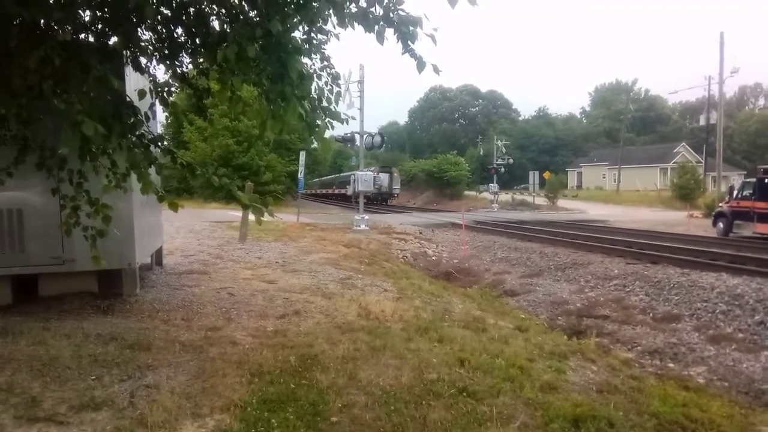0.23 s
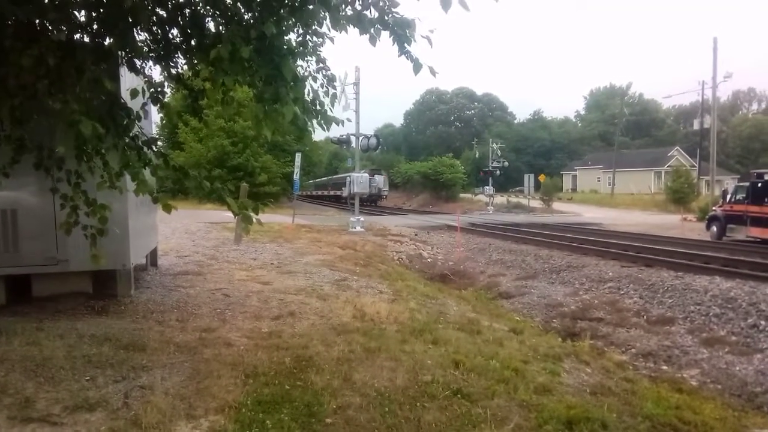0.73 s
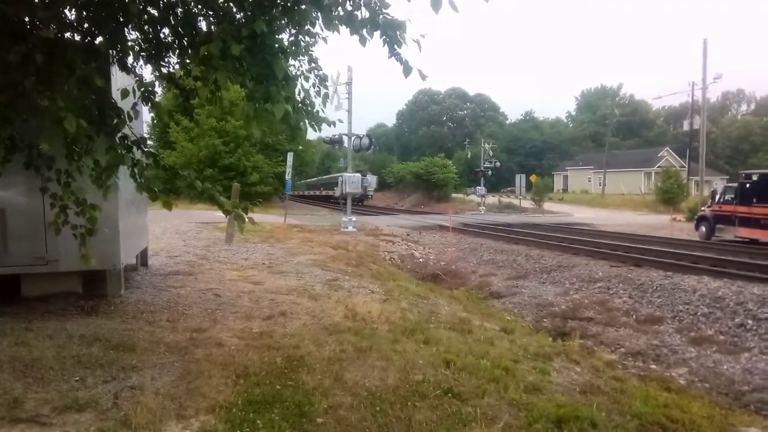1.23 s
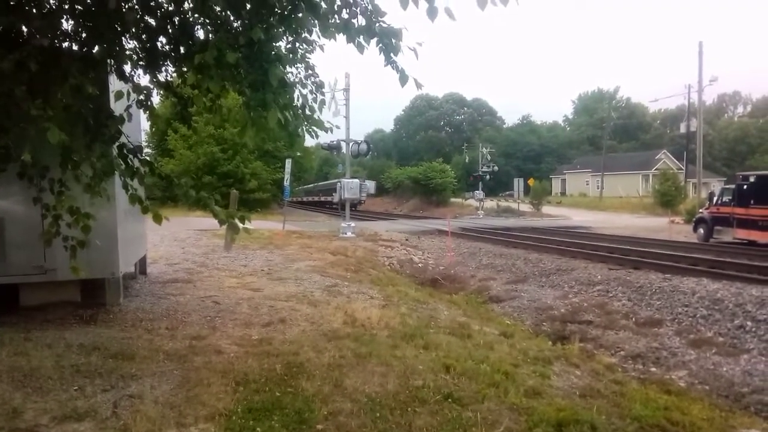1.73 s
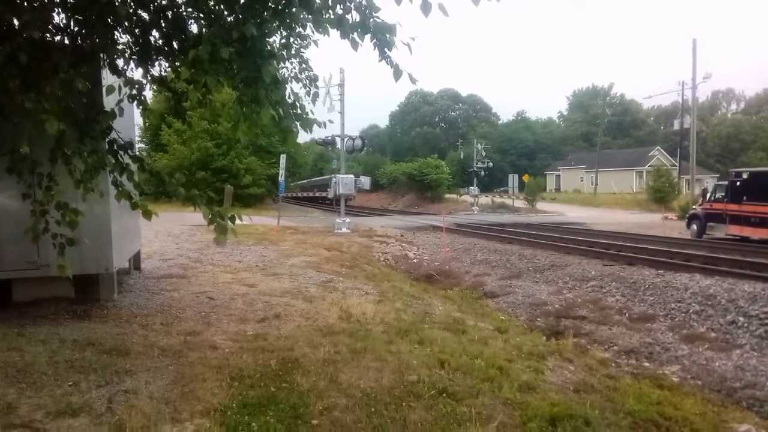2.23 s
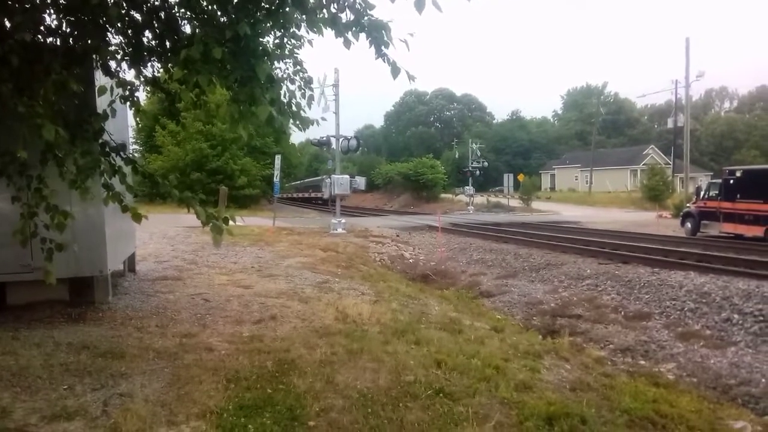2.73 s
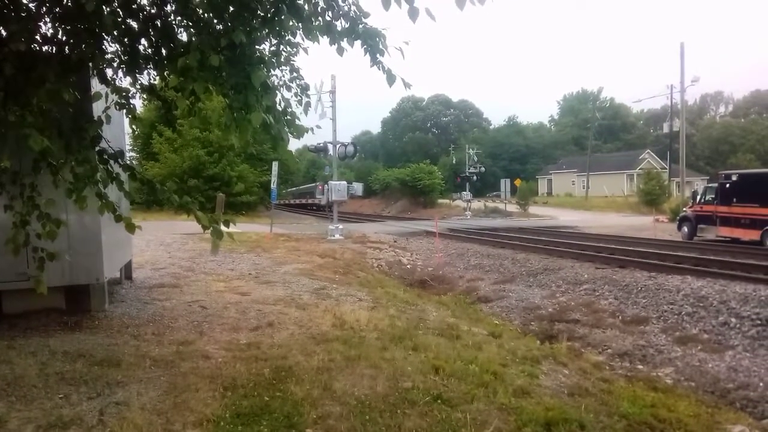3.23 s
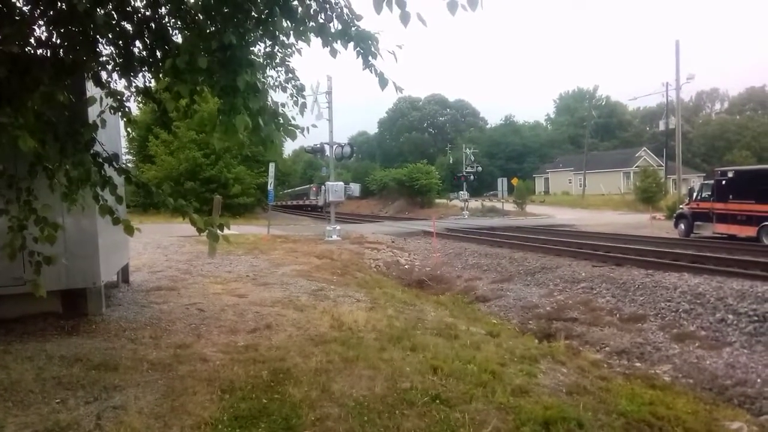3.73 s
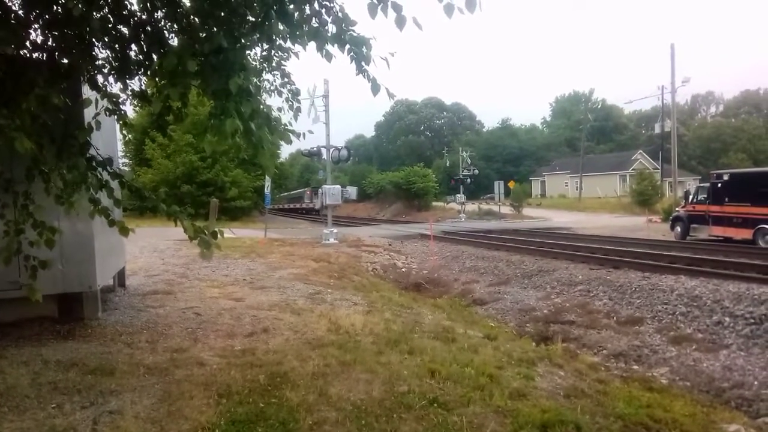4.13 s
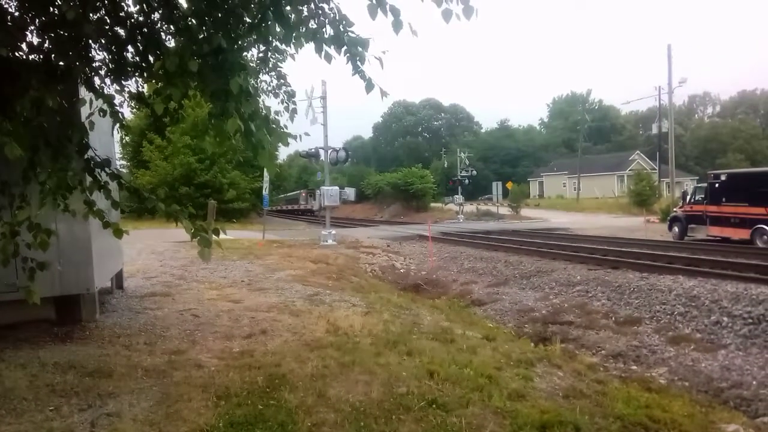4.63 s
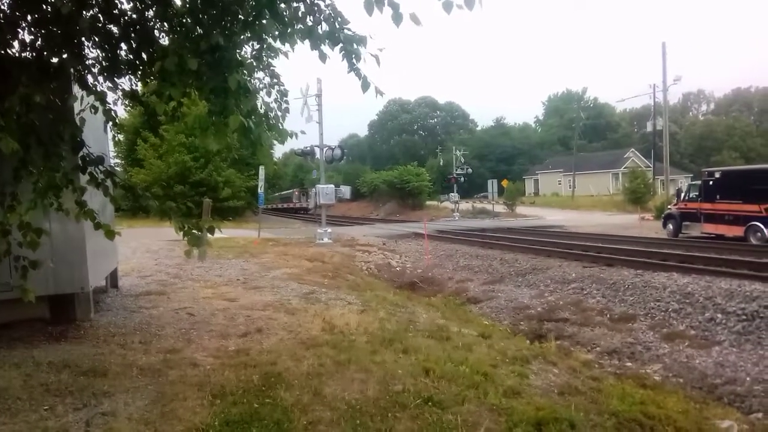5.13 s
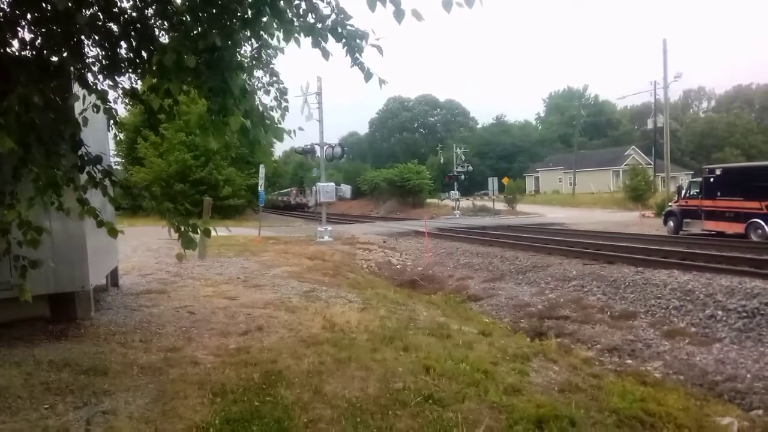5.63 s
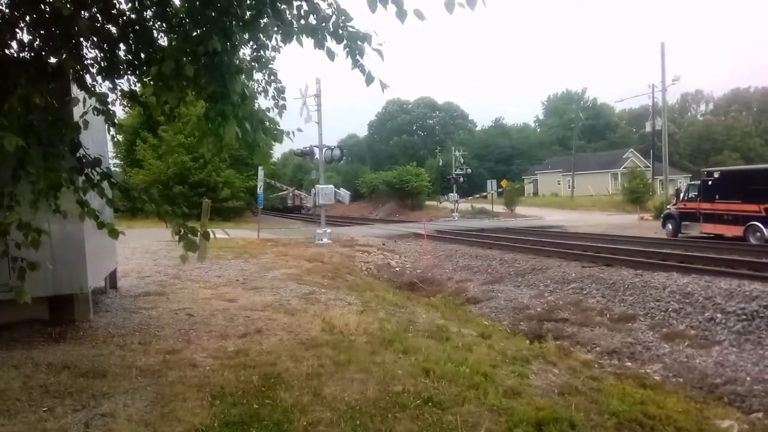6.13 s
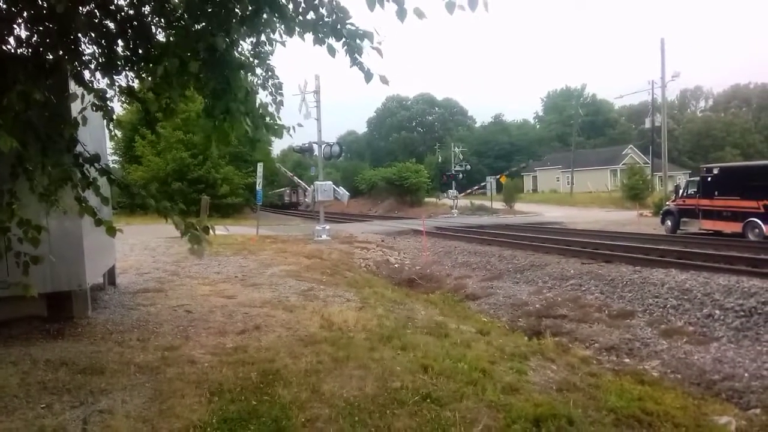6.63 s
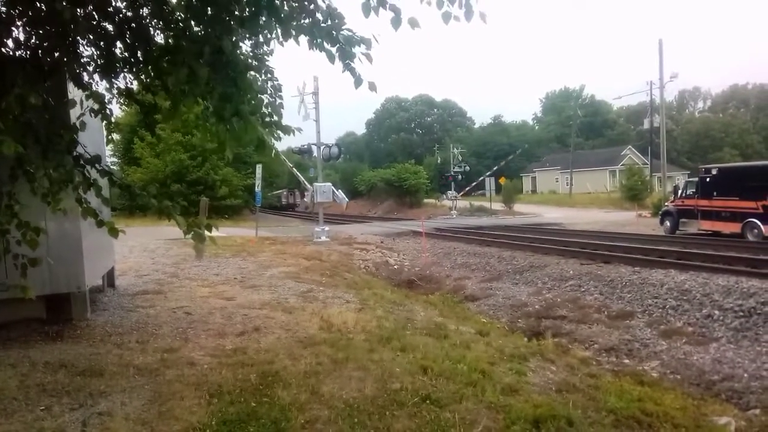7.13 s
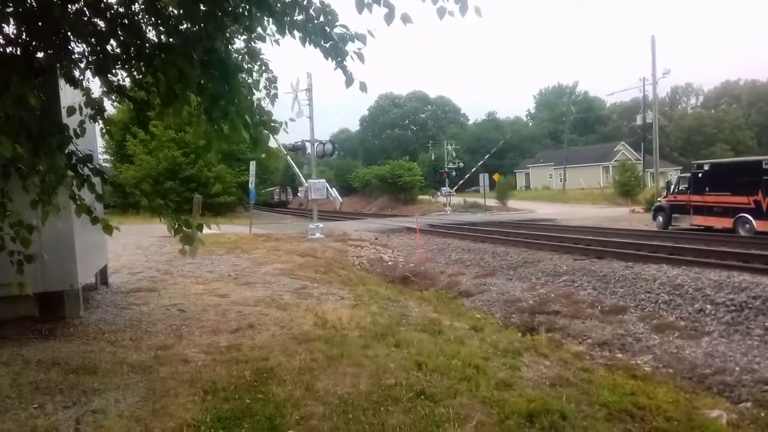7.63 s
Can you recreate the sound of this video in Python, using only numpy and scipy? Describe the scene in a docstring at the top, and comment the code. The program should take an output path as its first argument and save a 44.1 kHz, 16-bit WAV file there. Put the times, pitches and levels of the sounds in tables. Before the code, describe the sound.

Close songbird outdoors repeats a single clear whistle five times, each sliding upward, flicking sharply higher and snapping down, with close wall reflections and a faint late echo. A distant train drones low with soft hiss and a thin steady whine. Tiny chips and peeps come from other birds. Past five seconds a metal latch clatters, then a waiting truck revs up. Phone microphone, mono, dull at the very top.

```python
"""Songbird by a railway crossing

A songbird in a tree whistles one note five times: a slow rise, a flick up, a quick fall, all gliding sines.
A shed wall close by throws each note back, trees smear it and far walls answer late, as one impulse response.
A distant train drones in filtered noise, a gate latch clatters as ringing modes, small birds peep and chip,
and a waiting truck revs up on crank orders and intake hiss. A phone with gain control hears it all."""
import sys
import numpy as np
from scipy import signal
from scipy.fft import rfft, irfft
from scipy.io import wavfile
from scipy.ndimage import uniform_filter1d

SR = 44100
rng = np.random.default_rng(int(sys.argv[2]) if len(sys.argv) > 2 else 0)


def volts(x):
    """Linear amplitude factor 10**(x/20) for a level x in dB, scalar or array-like."""
    e = np.asarray(x, float) / 20
    return 10 ** e


def persist_wave(psi):
    """Save psi, clipped to +-1, as 16-bit WAV."""
    counts = np.round(np.clip(psi, -1, 1) * 32767).astype(np.int16)
    wavfile.write(sys.argv[1], SR, np.atleast_2d(counts).T)


N = 347508
TIME = np.arange(N) / SR

# Distant train and town. Each row: time in seconds, rumble level in dB, change of the hiss in dB.
AIR_LEVELS = [(0.0, -46.5, -1), (0.35, -44.5, 3.5), (0.61, -44.5, 1), (2.48, -46.5, -0.5),
              (3.14, -46.5, -2.5), (3.53, -46.5, -2), (3.88, -46, -2.5), (5.07, -47, -2.5), (5.46, -45, -2),
              (7.48, -44, -0.5), (7.88, -46, 0.5)]
# Tone colour of that far noise. Each row: frequency in Hz, relative density in dB per Hz.
AIR_COLOUR = [(25, -23.5), (48, -23.5), (64, -2), (110, -4), (310, -10.5), (500, -19), (790, -14),
              (1300, -22.5), (2000, -22.5), (4000, -24.5), (5000, -28), (6300, -34), (7200, -43),
              (8000, -41.5)]
# Steady droning lines. Each row: centre in Hz, width of each of two filters in Hz, level in dB.
DRONE_LINES = [(68.1, 9.3, -50.5), (100.7, 9.1, -56.5), (169.94, 6.5, -52.5), (261.2, 7.9, -65.5),
               (1599, 160, -59)]
# Path of the whine. Each row: time in seconds, pitch in Hz, level in dB before it wavers.
WHINE_PATH = [(0, 1563, -61), (2.2, 1563, -60), (2.7, 1562, -57), (4.2, 1562, -57), (4.9, 1563, -63),
              (7.88, 1563, -63)]

# The truck revving up. Each row: time in seconds, firing rate in Hz, engine level in dB, intake hiss in dB.
TRUCK_REVS = [(6.451, 83.5, -59, -42.5), (6.599, 95.37, -53, -67), (6.776, 127.5, -44.5, -56.5),
              (6.86, 148, -44, -53), (6.986, 165.3, -43.5, -50), (7.205, 184.1, -46, -47.5),
              (7.492, 189.4, -44.5, -46), (7.88, 180.7, -49.5, -49.5)]
# Engine harmonics. Each row: order in sixths of the firing rate, relative level in dB.
CRANK_ORDERS = [(2, -24), (3, -34), (4, -6), (5, -10.5), (6, 2.5), (8, -12), (9, -20), (12, -15)]
# Intake resonances. Each row: centre in Hz, width of each of two filters in Hz, relative level in dB.
INTAKE_RESONANCES = [(2447, 170, -4), (3900, 1500, 1), (4740, 180, -13), (6160, 2400, -3)]

# Latch blows. Each row: start in seconds, peak in dB, weight of the lowest and highest modes in dB,
# rattle t60 in seconds.
LATCH_BLOWS = [(5.1718, -24.5, -8.5, 0.14), (5.1994, -26.5, -11, 0.15), (5.24, -33.5, -22, 0.2),
               (5.2705, -36.5, -15.5, 0.27), (5.3309, -24, -6.5, 0.18), (5.3663, -21.5, 4.5, 0.14),
               (5.4359, -26, 2.5, 0.2)]
# Ringing modes of the latch. Each row: frequency in Hz, relative level in dB, t60 in seconds.
LATCH_MODES = [(694, 1, .03), (857, 0, 0.043), (956, -2.5, 0.064), (1586, -6.5, 0.05), (1770, -3, 0.037),
               (2470, -1.5, 0.03), (3250, -5.5, 0.035), (4230, -8.5, 0.052), (6300, -8.5, 0.14)]

# Thin whistles of small birds and the first warble of a new phrase, one list per call.
# Each row: time in seconds, pitch in Hz, level in dB before the tree mix halves it.
PEEPS = [
    [(5.862, 6480, -60), (5.885, 6540, -44), (5.91, 6500, -60), (5.935, 6750, -54.5), (5.965, 6920, -61),
     (5.985, 7300, -56), (5.995, 7260, -69)],
    [(6.36, 4150, -59), (6.39, 4170, -53), (6.6, 4200, -52), (6.8, 4220, -55.5), (6.83, 4330, -58)],
    [(7.861, 2100, -42), (7.867, 3080, -38), (7.869, 2840, -36), (7.871, 2300, -32), (7.88, 3250, -30)],
]
# Very short chips. Each row: time in seconds 2 ms ahead of the peak, peak in dB before the tree mix
# halves it, pitch at the peak in Hz.
CHIPS = [(1.3184, -28.5, 5650), (1.515, -42.5, 5900), (6.6337, -43.5, 6400), (6.8404, -41, 5220)]

# Walls close by. Each row: delay in seconds, level in dB before the treble is dulled, sign.
NEAR_ECHOES = [(.0092, 0, -1), (.0031, -13, 1), (.0173, -12, 1), (.0222, -15, -1)]
# Scattering by leaves and trunks. Each row: onset in seconds, t60 in seconds, level in dB.
TREES = [(.008, 0.17, -8), (.03, 1.2, -18)]
# Far walls. Each row: delay in seconds, level in dB.
FAR_ECHOES = [(.488, -28.5), (.31, -37)]
WALL_DULL_HZ = 4100
FAR_HZ, FAR_BLUR_S = 3350, .00045  # far walls return a band around this pitch best

# Song notes. Each row: start in seconds, flick in seconds, level in dB before swell and throat,
# knee pitch in Hz, climb in Hz per second, held pitch in Hz, side voice level in dB.
NOTES = [(0.187, 0.321, -26, 2582, 5880, 3222, -39.5), (1.849, 1.993, -26, 2501, 6630, 3253, -38.5),
         (3.372, 3.506, -21.5, 2647, 4380, 3117, -47.5), (4.448, 4.584, -23.5, 2612, 4560, 3190, -39.5),
         (5.950, 6.09, -24, 2418, 6300, 3179, -37.5)]
# Swell of the rise. Each row: share of the rise, dB relative to the note level.
SWELL = [(0, -9), (0.059, -7.5), (.25, -5), (.45, -3), (1, -0.5)]
# Fall of the note. Each row: seconds after the flick, pitch in Hz, dB relative to the note level.
FALL = [(0, 3600, 1.5), (.003, 3150, -2.5), (.012, 2900, -3.5), (.021, 2470, 2.5), (.029, 1950, 0.5),
        (.032, 1850, -29)]
# The thin second voice. Each row: seconds from the flick start, pitch in Hz, dB relative to its own level.
SIDE_VOICE = [(-.05, 4400, -31), (-.042, 4350, -4.5), (-.02, 4050, 2), (0, 4050, -4), (.004, 4200, -21.5)]
# Breath of the snap. Each row: seconds from the flick start, pitch in Hz, dB relative to the note level.
AIRY = [(0, 7300, -51.5), (.006, 7300, -26.5), (.03, 7000, -25), (0.045, 7100, -50.5)]
# Throat and beak: low pitches leave weaker. Each row: pitch in Hz, gain in dB.
THROAT = [(1800, -19), (2400, -6), (2900, 3), (4800, -9.5)]
# Overtone colour. Each row: frequency of the 2nd or 3rd partial in Hz, gain in dB.
OVERTONES = [(3600, -15.5), (4600, -26), (6400, -26.5), (6900, -42), (7600, -36), (9000, -52.5)]
START_HZ, SCOOP_S, EASE_S = 1872, .012, 0.0121  # scoops up to the knee, climbs evenly, eases into the hold
FLICK_S, FLICK_TOP_HZ, FLICK_DB = .007, 4584, -12.5  # alike in every note, however loud its rise
OCTAVE_DB, THIRD_DB, SUM_TONE_DB = -20, -9, -13.5  # the octave too ignores the loudness of the rise


def curve(s, values, at=TIME):
    """Straight lines between points."""
    return np.interp(at, s, values)


def unit(x):
    """Scale to rms 1."""
    return x / np.sqrt(np.mean(x ** 2))


def band(x, hz, width_hz):
    """Resonance, gain 1 at the centre."""
    return signal.lfilter(*signal.iirpeak(hz, hz / width_hz, SR), x)


def walk(rate):
    """Smooth chance, spread 1, from about rate random steps a second."""
    k = int(SR / rate)
    steps = np.repeat(rng.standard_normal(N // k + 1), k)
    return unit(uniform_filter1d(uniform_filter1d(steps, k), k)[:N])


def whistle(s, hz, db, overtones=(), rough=0., wobble_hz=0.):
    """A gliding sine silent outside its span; overtones, if asked for, come unsteady and with the throat."""
    gate = np.clip(np.minimum(TIME - s[0], s[-1] - TIME) / .002, 0, 1)
    pitch = curve(s, hz)
    if wobble_hz:
        pitch = pitch + wobble_hz * walk(1500)
    phase = 2 * np.pi * (np.cumsum(pitch) / SR + rng.random())
    tone = np.sin(phase)
    if overtones:
        tone = tone * volts(curve(*np.transpose(THROAT), pitch))
        partials = 0
        for k, overtone_db in enumerate(overtones, start=2):
            colour_db = curve(*np.transpose(OVERTONES), k * pitch)
            partials = partials + volts(overtone_db + colour_db) * np.sin(k * phase)
        tone += volts(3.3 * walk(300)) * partials
    if rough:
        tone = tone * (1 + rough * walk(500))
    return np.sqrt(2) * gate * volts(curve(s, db)) * tone


def distance():
    """Half-octave bands of far noise that sway a little, droning lines and a wavering whine."""
    s, rumble_db, hiss_db = np.transpose(AIR_LEVELS)
    hz, colour_db = np.transpose(AIR_COLOUR)
    f = np.fft.rfftfreq(N, 1 / SR) + 1  # 1 Hz up, to keep the logarithm finite
    spectrum = rfft(rng.standard_normal(N)) * volts(curve(np.log(hz), colour_db, np.log(f)))
    middle = spectrum[(f > 200) & (f < 1400)]
    spectrum /= np.sqrt(2 * np.sum(np.abs(middle) ** 2)) / N  # rms 1 in the middle band
    air = 0
    mean_db = rumble_db.mean()
    for octave in np.arange(4, 13.5, .5):  # centres as powers of two in Hz
        part = irfft(spectrum * np.clip(1 - 2 * np.abs(np.log2(f) - octave), 0, 1), N)
        bright = np.clip((octave - 10.3) / 1.7, 0, 1)  # hands over from rumble to hiss
        moving_db = np.clip(octave - 7, .3, 1) * (rumble_db - mean_db)  # the deepest bands move less
        slow_db = (1 - bright) * moving_db + bright * hiss_db + mean_db
        air = air + part * volts(curve(s, slow_db) + 0.8 * walk(6))
    drone = 0
    for hz, width_hz, db in DRONE_LINES:
        line = band(band(rng.standard_normal(N), hz, width_hz), hz, width_hz)
        drone = drone + volts(db) * unit(line)
    whine = whistle(*np.transpose(WHINE_PATH)) * volts(2.8 * walk(8.3))
    return air + drone + whine


def truck():
    """Crank orders climb with the revs; the intake hisses once a firing."""
    s, firing_hz, engine_db, hiss_db = np.transpose(TRUCK_REVS)
    firings = np.cumsum(curve(s, firing_hz) * (1 + 0.0092 * walk(15))) / SR
    orders = 0
    for k, db in CRANK_ORDERS:
        tone = np.sin(2 * np.pi * (k / 6 * firings + rng.random()))
        orders = orders + volts(db + 2 * walk(5.4)) * tone
    gas = rng.standard_normal(N) * (.5 + np.exp(-(firings % 1) / .3))
    hiss = 0
    for hz, width_hz, db in INTAKE_RESONANCES:
        hiss = hiss + volts(db) * unit(band(band(gas, hz, width_hz), hz, width_hz))
    engine = np.sqrt(2) * volts(curve(s, engine_db)) * orders
    intake = volts(curve(s, hiss_db) + 1.1 * walk(14)) * unit(hiss)
    fade_in = np.clip((TIME - s[0]) / 0.33, 0, 1)
    return fade_in * (engine + intake)


def latch():
    """Each blow is a short rattle that cracks and rings the latch modes."""
    out = np.zeros(N)
    t = np.arange(int(.3 * SR)) / SR
    for s, peak_db, edge_db, rattle_t60 in LATCH_BLOWS:
        rattle = rng.standard_normal(len(t)) * volts(6 * rng.standard_normal(len(t)))  # spiky noise
        rattle = rattle * np.exp(-np.log(1000) * t / rattle_t60)
        ring = 0
        for hz, db, t60 in LATCH_MODES:
            level_db = db + 3.34 * rng.standard_normal()  # each blow excites the modes differently
            if hz < 1000 or hz > 6000:
                level_db += edge_db
            width_hz = np.log(1000) / np.pi / t60
            ring = ring + volts(level_db) * unit(band(rattle, hz, width_hz))
        crack = volts(4.5) * unit(band(rattle, 2700, 6000))
        hit = ring + crack
        i = int(s * SR)
        out[i:i + len(t)] += volts(peak_db) * hit / np.max(np.abs(hit))
    return out


def small_birds():
    """Thin gliding peeps, and very short chips whose pitch drops steeply under a bell-shaped swell."""
    out = sum(whistle(*np.transpose(peep), rough=.15) for peep in PEEPS)
    for s, db, hz in CHIPS:
        t = TIME - s - .002
        swell = np.exp(-(t / 0.0014) ** 2)
        out += volts(db) * swell * np.sin(2 * np.pi * (hz * t - 290000.0 * t ** 2))
    return out


def surroundings(walls):
    """Impulse response: direct sound, walls close by, leaves and trunks that scatter, far walls."""
    t = np.arange(int(1.2 * SR)) / SR
    response = np.zeros(len(t))
    for s, db, sign in walls:
        response += np.sign(sign) * volts(db) * np.sinc((t - s) * SR)
    # boards return the treble weaker
    response = signal.filtfilt(*signal.butter(4, WALL_DULL_HZ, fs=SR), response)
    response[0] += 1  # direct sound
    for onset, t60, db in TREES:
        decay = np.exp(-np.log(1000) * t / t60) * (1 - np.exp(-t / onset))
        tail = rng.standard_normal(len(t)) * decay
        response += volts(db) * tail / np.sqrt(np.sum(tail ** 2))
    for s, db in FAR_ECHOES:
        blur = np.exp(-((t - s) / FAR_BLUR_S) ** 2)
        gain = volts(db) * 2 / (np.sqrt(np.pi) * FAR_BLUR_S * SR)  # makes db the gain at FAR_HZ
        response += gain * np.cos(2 * np.pi * FAR_HZ * (t - s)) * blur
    return response


def songbird():
    """One side of the voice box rises, flicks up and falls; the other side adds a thin rasp."""
    out = np.zeros(N)
    share, swell_db = np.transpose(SWELL)
    for start, end, db, knee_hz, climb, held_hz, side_db in NOTES:
        fine = np.linspace(start, end, num=80)
        t = fine - start
        ease_hz = climb * EASE_S
        # soft minimum of the even climb and the held pitch
        ramp = -ease_hz * np.logaddexp(-(knee_hz + climb * t) / ease_hz, -held_hz / ease_hz)
        pitch = ramp - (knee_hz - START_HZ) * np.exp(-t / SCOOP_S)
        level_db = db + curve(start + share * (end - start), swell_db, fine)
        last_hz = pitch[-1]
        flick = end + FLICK_S * np.array([.4, .8, 1.2, 1.5])
        flick_hz = last_hz + (FLICK_TOP_HZ - last_hz) * np.array([.25, .72, .95, .98])
        flick_db = FLICK_DB + np.array([-5, 0, -1, -14])
        out += whistle(np.r_[fine, flick], np.r_[pitch, flick_hz], np.r_[level_db, flick_db],
                       overtones=(OCTAVE_DB - db, THIRD_DB))
        after, hz, fall_db = np.transpose(FALL)
        out += whistle(flick[2] + after, hz, db + fall_db, overtones=(-40,), rough=0.3, wobble_hz=59.9)
        after, hz, thin_db = np.transpose(SIDE_VOICE)
        thin_db = side_db + thin_db
        out += whistle(end + after, hz, thin_db, rough=0.7, wobble_hz=261)
        # the two sides mix in the windpipe into a faint sum tone
        out += whistle(end + after, hz + last_hz, thin_db + SUM_TONE_DB, rough=0.95, wobble_hz=60)
        after, hz, airy_db = np.transpose(AIRY)
        out += whistle(end + after, hz, db + airy_db, rough=1.3, wobble_hz=590)
    return out


def scene():
    """The songbird sits by the shed wall; the small birds are heard half direct, half through the trees."""
    background = distance() + truck() + latch()
    birds = small_birds()
    through_trees = signal.fftconvolve(birds, surroundings(NEAR_ECHOES[2:]))[:N]
    further = (birds + through_trees) / 2
    near = signal.fftconvolve(songbird(), surroundings(NEAR_ECHOES))[:N]
    return (background + further + near)[None]


def low_pass(x):
    """Removes everything above the highest recorded frequency."""
    return signal.sosfilt(signal.butter(12, 7800, fs=SR, output="sos"), x)


def record(dry):
    """Gain control eases off under loud notes, sparing the bass; the microphone path ends steeply near the top."""
    follow = 1 / (.015 * SR)  # 15 ms level follower
    loud = np.sqrt(signal.lfilter([follow], [1, follow - 1], dry ** 2) + 1e-12)
    bass = signal.sosfiltfilt(signal.butter(2, 300, fs=SR, output="sos"), dry)
    gain = (1 + (loud / volts(-26)) ** 2) ** -.33
    eased = bass + (dry - bass) * gain
    # 60 dB down from 8970 Hz up
    cut = signal.sosfilt(signal.cheby2(8, 60, 8970, fs=SR, output="sos"), eased)
    return low_pass(cut)


dry = scene()
out = record(dry)
persist_wave(out)
```